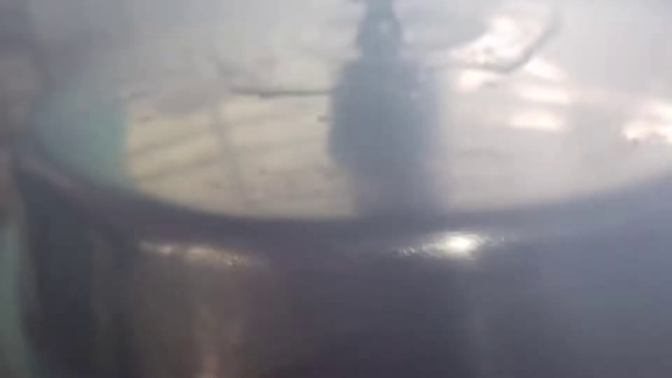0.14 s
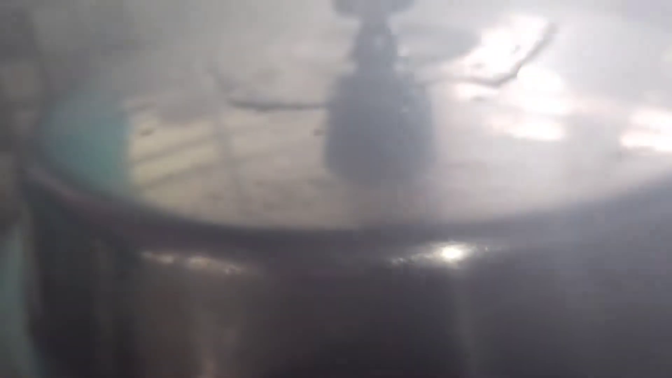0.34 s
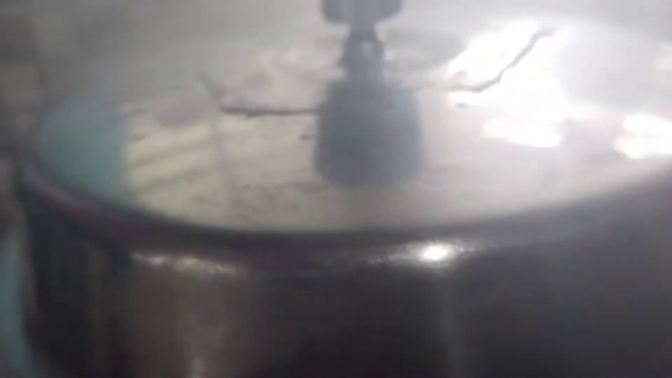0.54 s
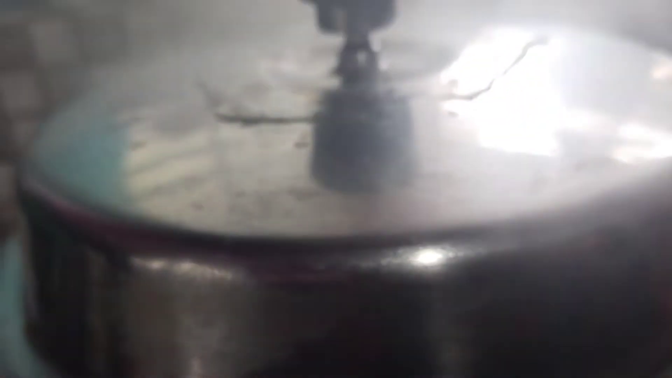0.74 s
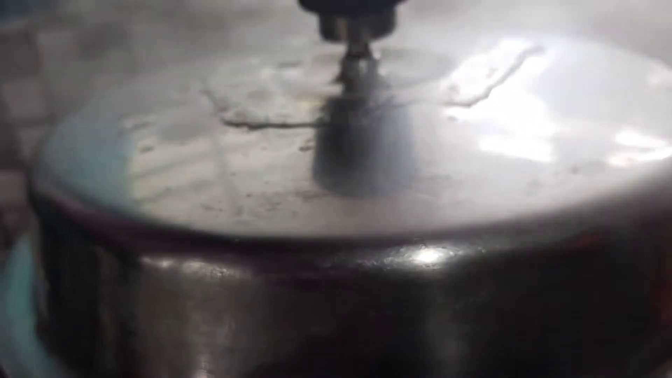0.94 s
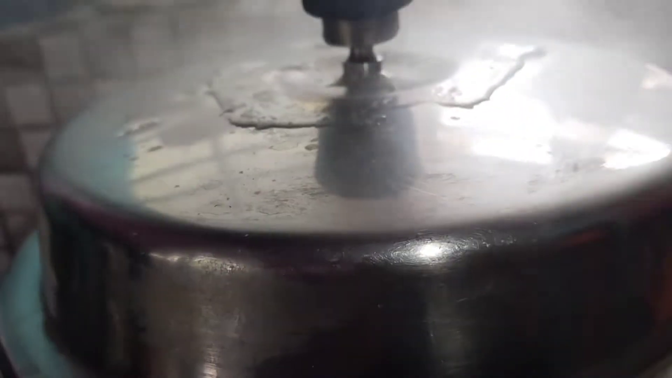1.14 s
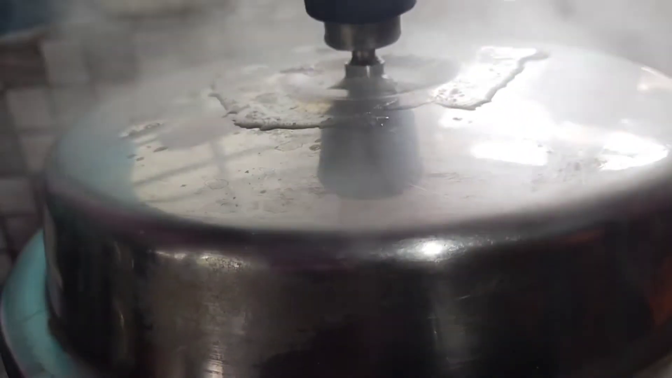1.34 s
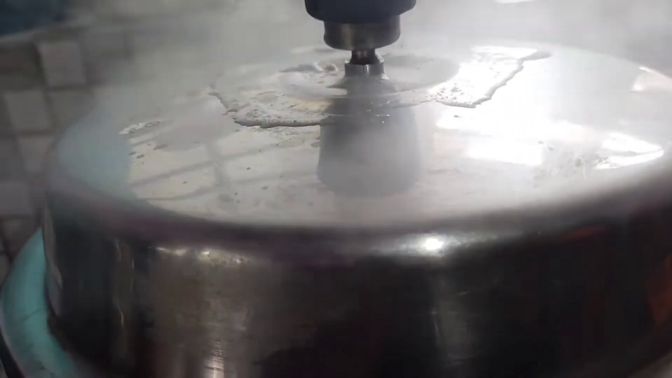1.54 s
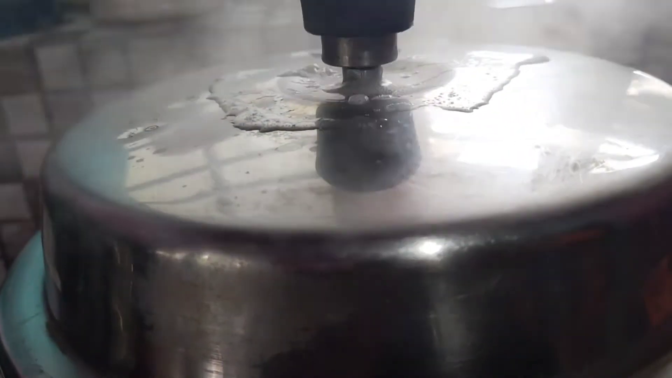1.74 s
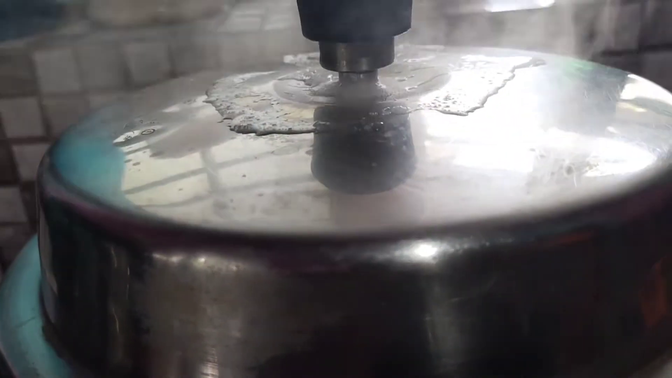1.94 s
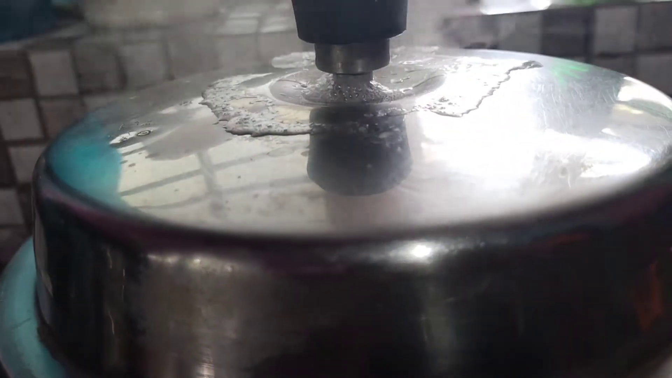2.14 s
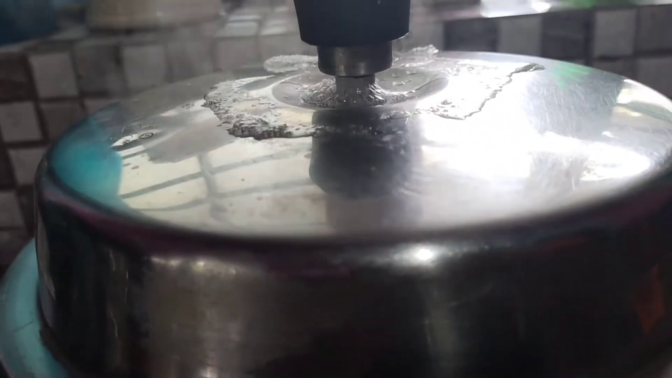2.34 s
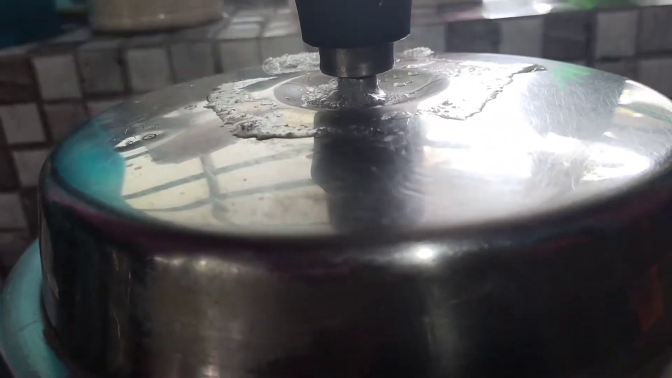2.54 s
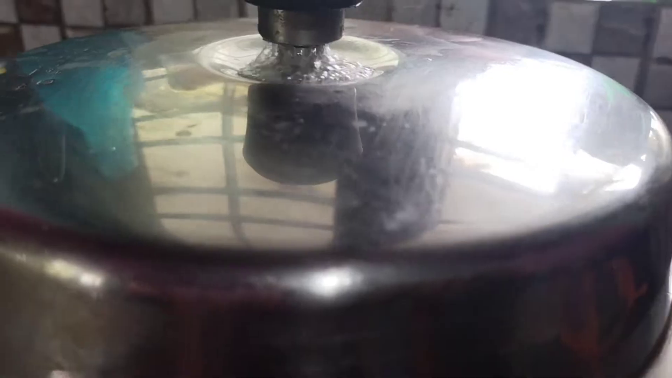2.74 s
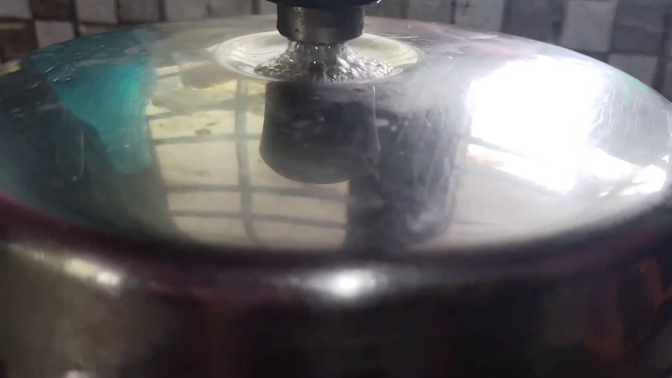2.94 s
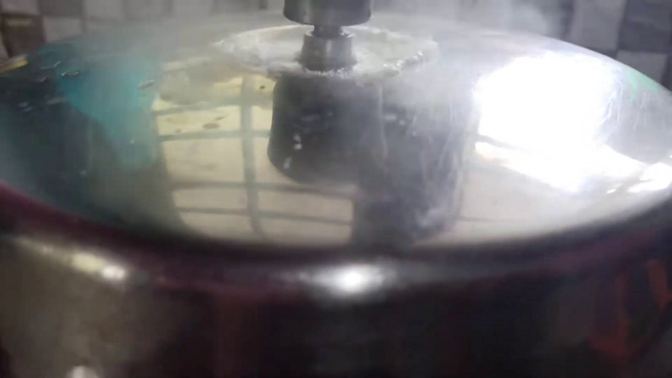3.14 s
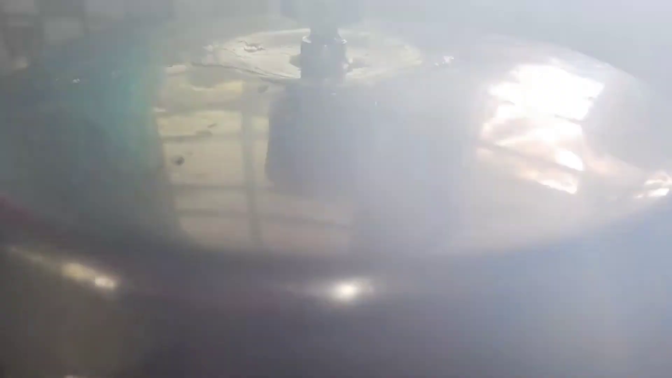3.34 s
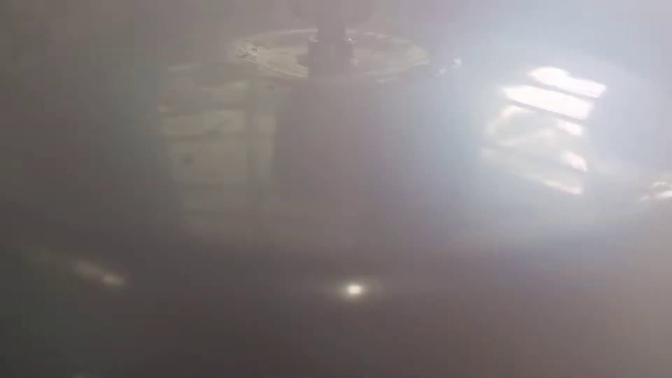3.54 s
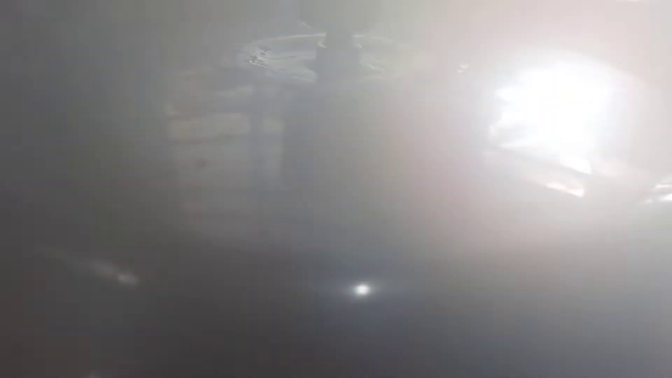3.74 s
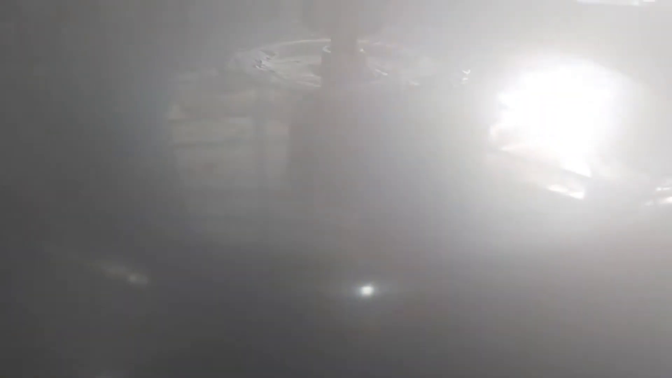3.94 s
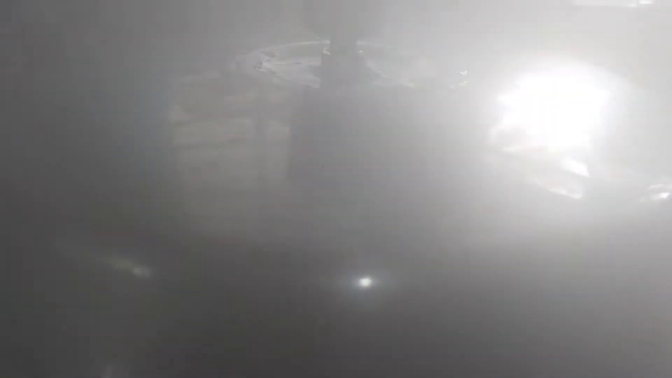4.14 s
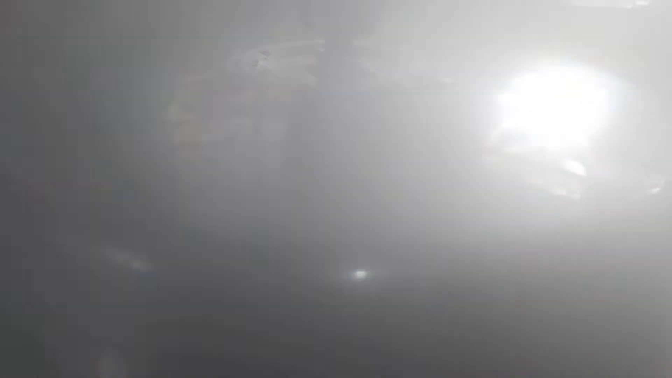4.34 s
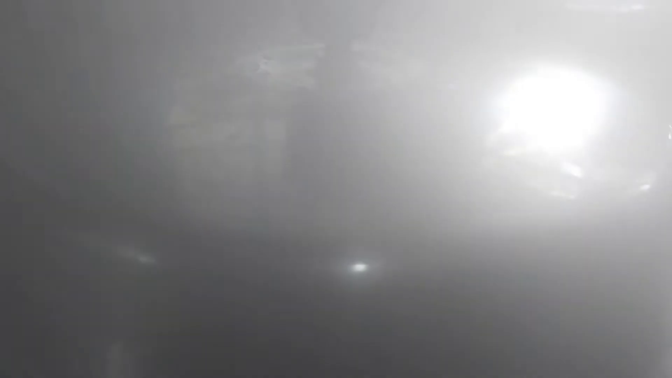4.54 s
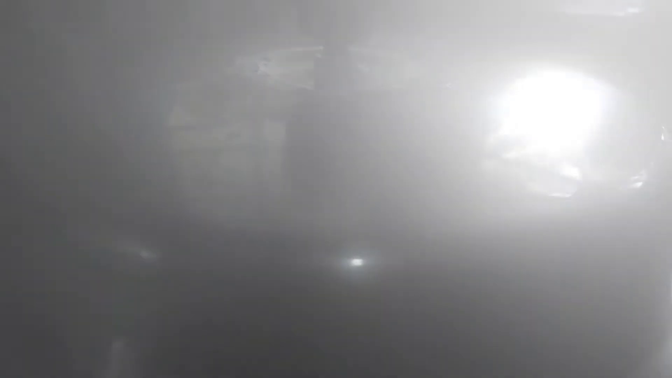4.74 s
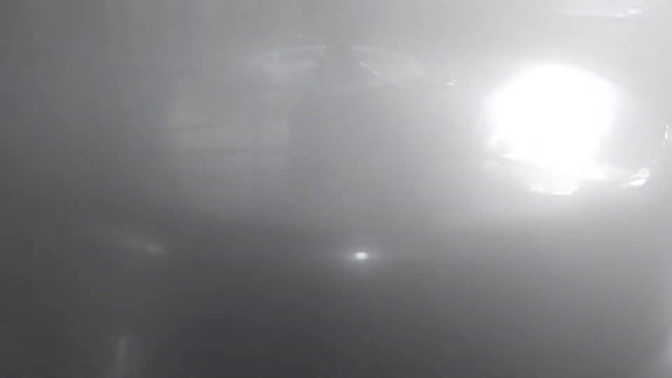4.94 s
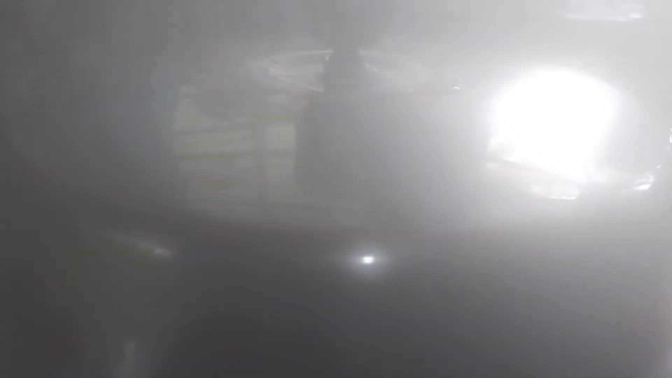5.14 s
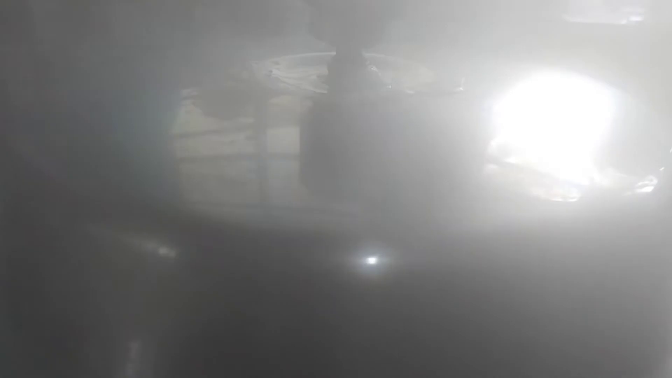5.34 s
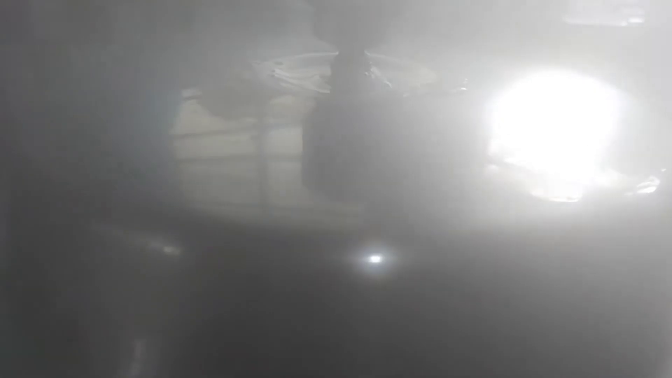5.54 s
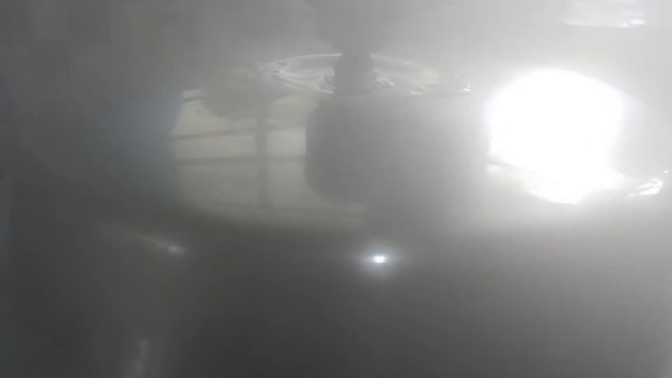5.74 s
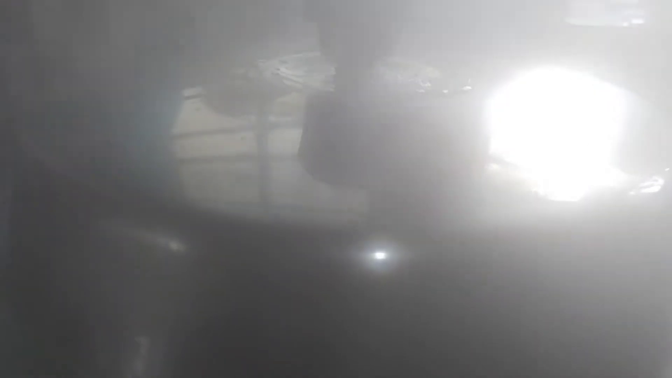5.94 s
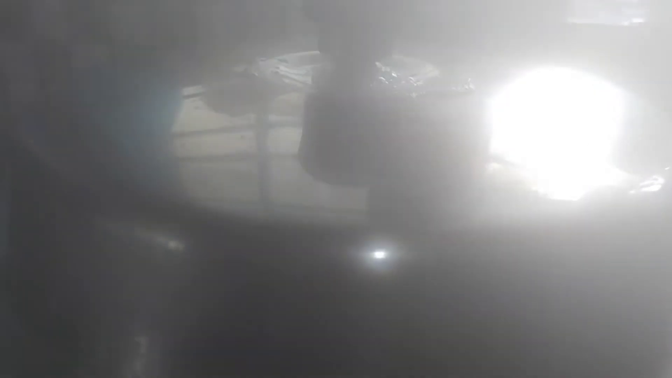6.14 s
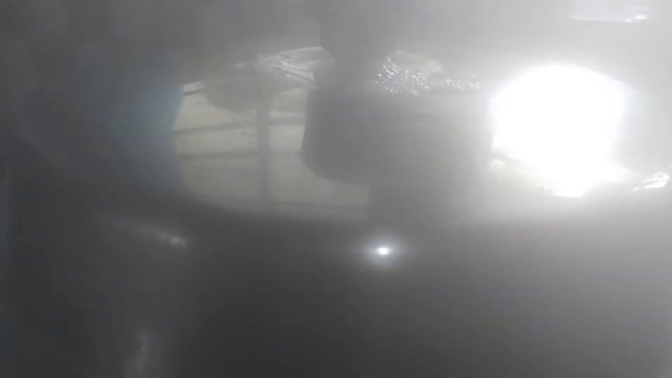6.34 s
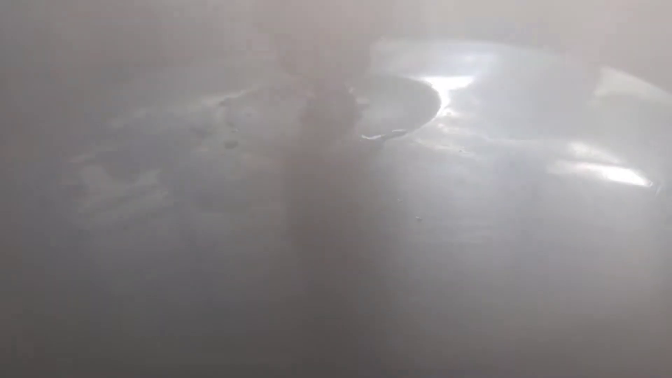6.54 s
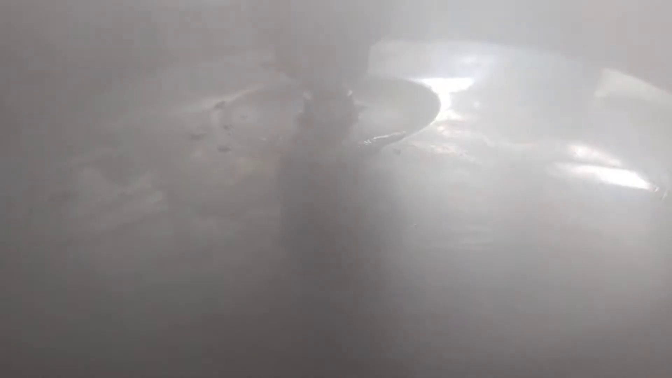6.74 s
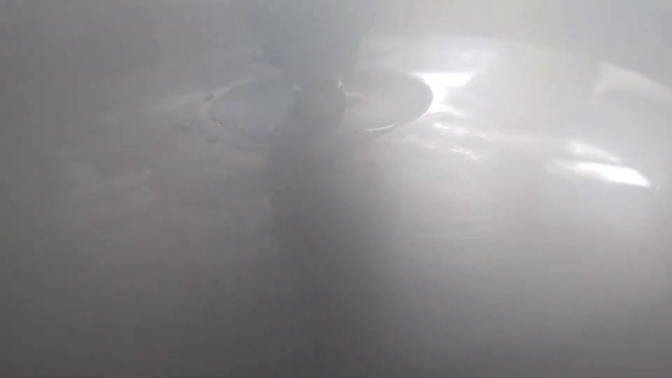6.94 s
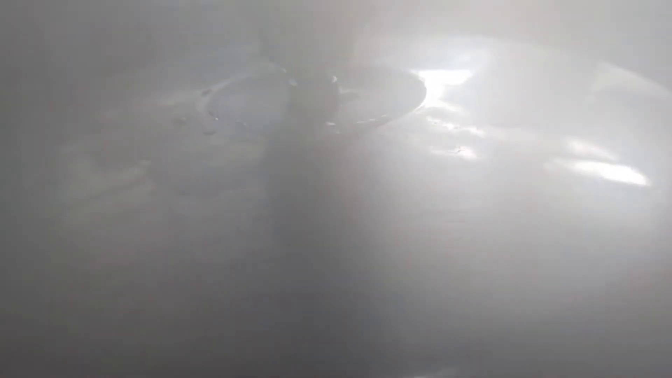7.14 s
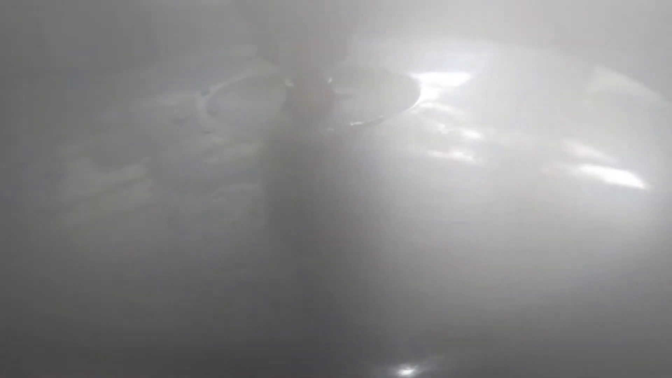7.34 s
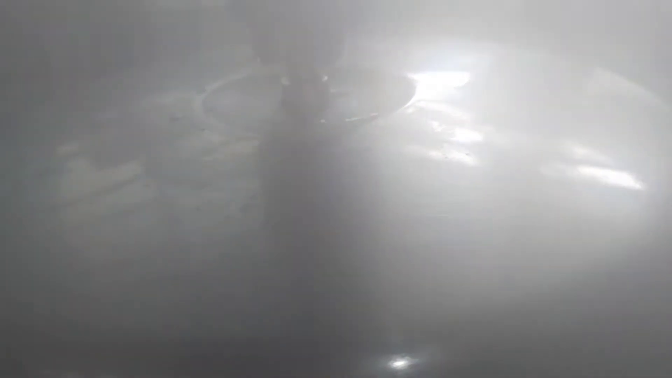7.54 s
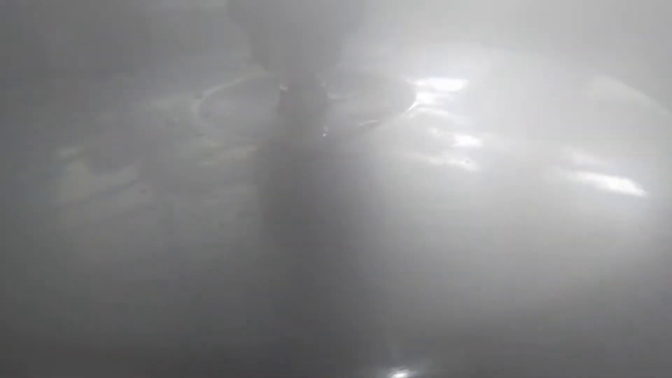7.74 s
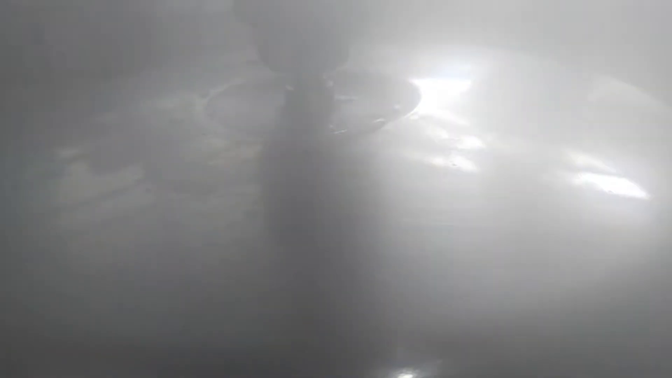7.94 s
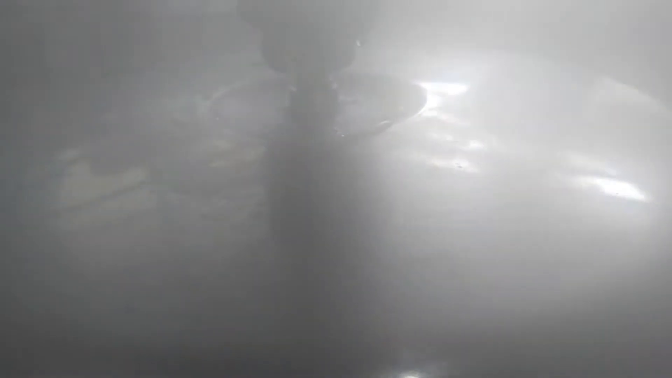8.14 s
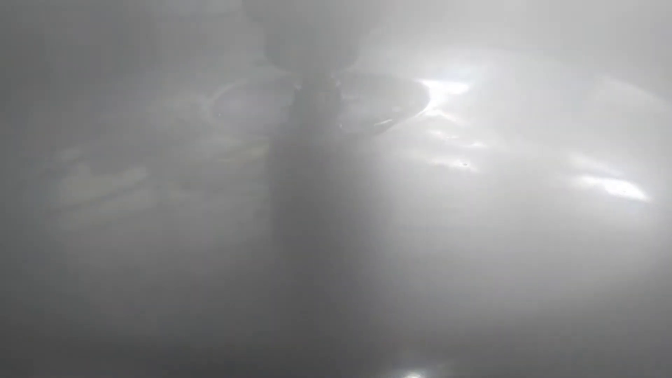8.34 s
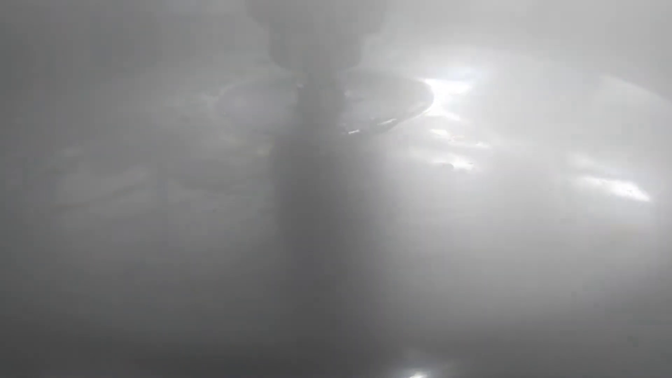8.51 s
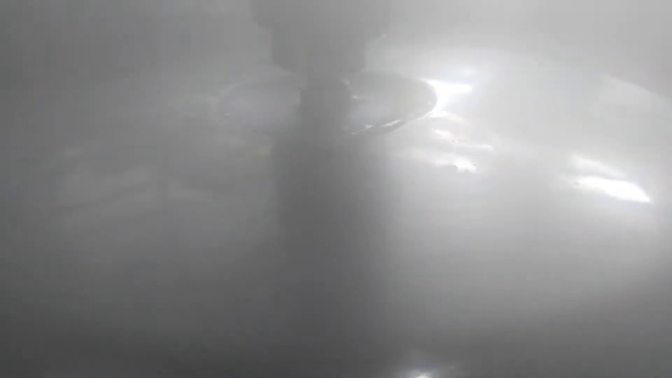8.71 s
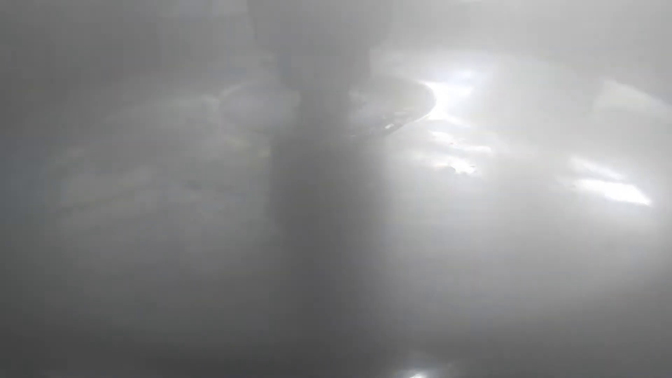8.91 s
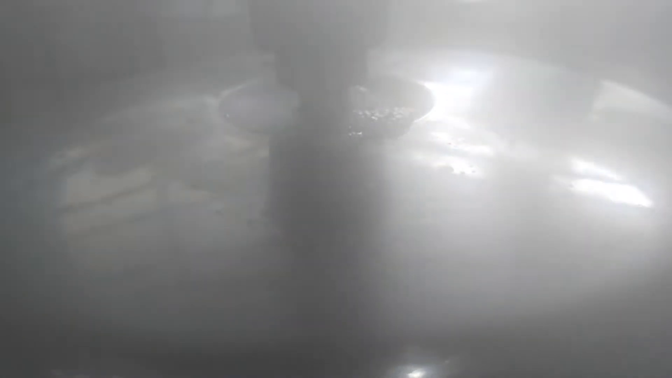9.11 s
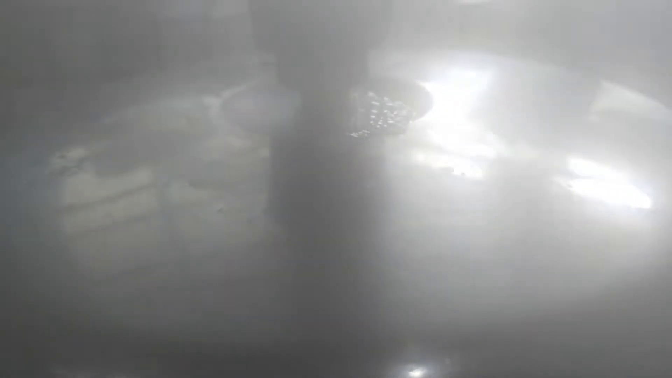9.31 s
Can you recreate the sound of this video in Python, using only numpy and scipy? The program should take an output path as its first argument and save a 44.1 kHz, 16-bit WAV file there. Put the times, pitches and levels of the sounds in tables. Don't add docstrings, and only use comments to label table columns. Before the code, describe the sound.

A stovetop cooker releases three long steam jets, each a dense bright hiss with a steady high whistle and low turbulent gusting. The weight knocks and scrapes on the ringing metal lid after each. Between jets, thin leaks, soft puffs, simmer and low flame rumble emerge. Abrupt scene changes and a tiny silence separate the sections. The stereo microphone is very close, with the whistle stronger on the left.

```python
import sys
import numpy as np
from scipy import signal
from scipy.fft import rfft, irfft, next_fast_len
from scipy.io import wavfile
from scipy.ndimage import uniform_filter1d

SR = 44100
rng = np.random.default_rng(int(sys.argv[2]) if len(sys.argv) > 2 else 0)


def gain_from_db(level_db):
    decades = np.asarray(level_db, float) / 20
    return 10 ** decades


def transcribe(signal):
    frames = np.atleast_2d(signal).T
    limited = np.clip(frames, -1, 1)
    pcm = np.round(limited * 32767).astype(np.int16)
    wavfile.write(sys.argv[1], SR, pcm)


N = 417627

# start [s], end [s], lag of the
STAGES = [(0, 2.602, 9), (2.602, 4.45, 9), (4.45, 6.4, 9), (6.4, 9.47, 12)]
# blast sets in [s], weight drops [s], level [dB], sag [dB/s], fall after the drop
# [dB/s].
BLASTS = [
    (0, 1.751, -20, -1.45, -140),
    (3.042, 5.885, -23, 0.41, -140),
    (6.467, 8.88, -21, -.5, -200),
]
# start [s], end [s], level [dB], slope [dB/s], share of treble kept [0-1].
LEAKS = [(2.0, 2.608, -67.5, 11.5, 0.94), (6.03, 6.333, -55.5, -1, 0), (6.434, 6.463, -53, 149.5, 0.1),
         (8.973, 9.194, -37, -94, 0), (9.1, 9.468, -60.5, 1, 0)]

SHARED_HISS, SHARED_WHISTLE = 0.36, 0.85
RING_DELAY = 13
SILENT_DB = -140


def unit(x):
    return x / np.sqrt(np.mean(x ** 2, axis=-1, keepdims=True) + 1e-20)


def coloured(x, points):
    hz, db = np.transpose(points)
    size = next_fast_len(N)
    bins_hz = np.arange(size // 2 + 1) * SR / size
    gain = gain_from_db(np.interp(np.log(bins_hz + 1), np.log(hz), db))
    return unit(irfft(rfft(x, size) * gain, size)[..., :N])


def resonate(x, hz, width_hz):
    r = np.exp(-np.pi * width_hz / SR)
    poles = [1, -2 * r * np.cos(2 * np.pi * hz / SR), r * r]
    return signal.lfilter([(1 - r * r) / 2, 0, (r * r - 1) / 2], poles, x)


def flutter(rate_hz, db):
    r = np.exp(-80 * np.pi * rate_hz / SR)
    slow = signal.lfilter([1], [1, -2 * r, r * r], rng.standard_normal(N // 40 + 2002))
    slow = unit(slow[2000:])
    return gain_from_db(db * np.interp(np.arange(N) / 40, np.arange(len(slow)), slow))


def ramps(rows):
    t = np.arange(N) / SR
    slopes = [np.where((t >= s) & (t <= end), db + slope * (t - s), SILENT_DB) for s, end, db, slope in rows]
    return np.max(slopes, axis=0)


def steps(starts, values, glide_s):
    row = np.searchsorted(starts, np.arange(N) / SR, "right") - 1
    held = np.array(values, float)[row]
    return uniform_filter1d(held, round(glide_s * SR) + 1, axis=0)


def span(start_s, end_s):
    return slice(round(start_s * SR), round(end_s * SR))


def flow():
    t = np.arange(N) / SR
    hold = [(onset, drop, db, sag) for onset, drop, db, sag, fall in BLASTS]
    dying = [(drop, drop + 0.5, db + sag * (drop - onset), fall) for onset, drop, db, sag, fall in BLASTS]
    steady = ramps(hold + dying + [row[:4] for row in LEAKS])
    peak_s, period_s = 2.64, 0.198
    throb = -32 + 2.5 * np.cos(2 * np.pi * (t - peak_s) / period_s)
    puffs = np.where((t >= 2.604) & (t < 3.04), throb, SILENT_DB)
    falter = -3 * np.exp(-((t - 3.76) / 0.13) ** 2)
    return np.maximum(steady, puffs) + falter


def whistle_band(x):
    return signal.sosfilt(signal.butter(2, [1800, 4800], "band", fs=SR, output="sos"), x)


def left_port(common, own, spare, ring5_db, ring7_db, top_db):
    # centre [Hz], width [Hz], level [dB].
    whistle_modes = [
        [(2890, 3800, -6), (2560, 130, 6), (2880, 155, 10), (3043, 29, 12), (3520, 280, -12.5)],
        [(2770, 340, -7.5), (2505, 80, -13), (2895, 120, -4), (3073, 34, 1), (3340, 77, -6)],
        [(2960, 230, -3), (2510, 420, -6), (2820, 110, -1.5), (2984, 28, 3.5), (3490, 82, -1)],
        [(2850, 3300, -4.5), (2480, 75, -0.5), (2682, 65, 10), (2785, 44, 7), (2950, 60, 10)],
    ]
    # centre [Hz], width [Hz].
    modes_5k = [(6050, 1900), (5400, 2800), (5295, 610), (6150, 2600)]
    modes_7k = [(7260, 1530), (7250, 790), (7120, 1540), (7210, 1600)]
    # frequency [Hz], level [dB per Hz].
    top_colour = [(3000, -44), (4500, -11.5), (8000, 0.5), (10000, 2.5), (11200, 6), (12700, 9),
                  (15000, -5), (15600, 1.5)]
    whistle, ring5, ring7, hiss = np.zeros((4, N))
    for (start, end, lag), modes, mode5, mode7 in zip(STAGES, whistle_modes, modes_5k, modes_7k):
        part = span(start, end)
        alike = np.sqrt(SHARED_HISS) * np.roll(common, lag + RING_DELAY)
        hiss[part] = (alike + np.sqrt(1 - SHARED_HISS) * own)[part]
        heard = whistle_band(np.roll(common, lag)[part])
        whistle[part] = unit(sum(gain_from_db(db) * resonate(heard, hz, width) for hz, width, db in modes))
        ring5[part] = unit(resonate(resonate(spare[part], *mode5), *mode5))
        ring7[part] = unit(resonate(resonate(hiss[part], *mode7), *mode7))
    left = gain_from_db(7.5) * whistle * flutter(21, 0.16)
    left += gain_from_db(ring5_db + 7.0) * ring5 * flutter(21, 0.68)
    left += gain_from_db(ring7_db + 2.0) * ring7 * flutter(21, 0.98)
    return left + gain_from_db(top_db + 2.5) * coloured(hiss, top_colour)


def right_port(common, own, spare, top_db):
    # frequency [Hz], level [dB per Hz].
    jet_colour = [(900, -30.5), (1900, -3.5), (3000, 3), (4500, 0), (7500, -2), (9000, 2.5), (10000, -3),
                  (15500, -5)]
    hiss = np.sqrt(SHARED_HISS) * np.roll(common, RING_DELAY) + np.sqrt(1 - SHARED_HISS) * own
    tone = np.sqrt(SHARED_WHISTLE) * common + np.sqrt(1 - SHARED_WHISTLE) * spare[::-1]
    tone = whistle_band(tone)
    tone = resonate(tone, 3000, 2200) + 0.5 * resonate(tone, 2680, 120)
    return gain_from_db(top_db + 10.5) * coloured(hiss, jet_colour) + gain_from_db(-24) * unit(tone)


def swaying_dips(hiss):
    # dip centre [Hz], width [Hz], depth [0-1].
    dips = [(5100, 500, .25), (11300, 1200, .45), (12200, 1200, .4), (5200, 400, .55)]
    for (start, end, lag), (hz, width_hz, depth) in zip(STAGES, dips):
        part = span(start, end)
        for shift in (-0.035, 0.035):
            sway = np.clip(depth * flutter(6, 5.5)[part], 0, 1)
            hiss[:, part] -= sway * resonate(hiss[:, part], hz * (1 + shift), width_hz)
    return hiss


def dull_leaks(hiss):
    dull = signal.sosfilt(signal.butter(6, 10400, fs=SR, output="sos"), hiss)
    dull += gain_from_db(-10) * signal.sosfilt(signal.butter(6, 13000, "high", fs=SR, output="sos"), hiss)
    kept = np.ones(N)
    for start, end, db, slope, share in LEAKS:
        kept[span(start, end)] = share
    kept = signal.lfilter([0.0006], [1, -0.9994], kept, zi=[1.0])[0] ** 2
    kept[span(*BLASTS[2][:2])] = 1
    return dull + kept * (hiss - dull)


def jet():
    # start [s], 5 kHz ring [dB], 7 kHz ring [dB],
    # top hiss [dB], left over right in the top hiss [dB].
    aim = [(0, -11.5, -9, -8.5, -2), (1.0, -11.5, -7, -9.5, -6.5), (1.8, 0, -9, -10.5, -4),
           (2.05, 0.5, -3, -1, -2), (2.604, -4, 3, -7, 7), (3.04, -9, 0, -6.5, 3), (3.09, -2, 0, -3, -1),
           (3.14, -2.5, 0, -1, 2), (3.45, -3, 0.5, -3, 4), (4.0, -3, 0, -2.5, 5.5),
           (4.22, -4.5, 0.5, -5, 2), (4.45, -7, 0, -4.5, 5.5), (4.75, -7.5, -3.5, -5, 7),
           (5.95, -5, -3, -6, 6), (6.15, -3.5, -1, -7, 0), (6.467, -8, -4, -6.5, -0.5),
           (7.5, -9, -2, -7.5, -3), (8.4, -7, -3, -8.5, -7.5), (8.93, -1.5, 2.5, -6.5, 1),
           (9.151, 0, 5, -9, -17)]
    starts, *values = np.transpose(aim)
    ring5_db, ring7_db, top_db, pan_db = steps(starts, np.transpose(values), 0.032).T
    common, own_left, own_right, spare = rng.standard_normal((4, N))
    left = left_port(common, own_left, spare, ring5_db, ring7_db, top_db + pan_db / 2)
    right = right_port(common, own_right, spare, top_db - pan_db / 2)
    hiss = dull_leaks(swaying_dips(np.array([left, right])))
    return gain_from_db(flow()) * flutter(23, 0.34) * flutter(5.2, 0.25) * hiss


def buffet():
    # time [s], level [dB].
    gusts = [
        [(0.0, -38.5), (0.308, -52), (0.524, -44.5), (0.71, -52), (1.268, -39.5), (1.744, -48), (1.76, -46)],
        [(3.05, -46.5), (3.1, -38), (3.2, -30.5), (3.23, -34), (4.03, -33.5), (5.69, -47.5), (5.89, -40.5)],
        [(6.48, -41.5), (6.52, -42), (6.71, -40.5), (7.92, -47), (7.96, -40), (8.19, -46), (8.88, -46.5)],
    ]
    # left over right [dB], more of it per dB of gust [dB].
    gust_sides = [
        (-10, 0.36),
        (1.5, 0.76),
        (0.5, 1.08),
    ]
    lifts, drops = np.transpose(BLASTS)[:2]
    gust_db = 7 + np.interp(np.arange(N) / SR, *np.vstack(gusts).T)
    blowing = [(onset, drop, 0, 0) for onset, drop in zip(lifts, drops)]
    falling = [(drop, drop + 0.5, 0, -260) for drop in drops]
    level_db = gust_db + ramps(blowing + falling)
    excess_db = gust_db + 34.5
    side_db, side_per_db = steps(lifts, gust_sides, 0).T
    pan_db = side_db + side_per_db * excess_db
    tilt_db = 2.5 - 0.24 * excess_db
    white = rng.standard_normal((2, 2, N))
    deep = coloured(white[0], [(25, -44), (60, -9), (110, -0.5), (300, 1.5), (600, -2), (1200, -18)])
    high = coloured(white[1], [(250, -17.5), (600, -6.5), (1200, -5.5), (1900, -4.5), (2600, -3), (4000, -46)])
    lumps = np.array([flutter(45, 0.8), flutter(45, 2.1)])
    mix = lumps * (gain_from_db(-2.5 - tilt_db) * deep + gain_from_db(1.5 + tilt_db) * high)
    return gain_from_db(level_db + pan_db / 2 * [[1], [-1]]) * mix


def rub():
    # start [s], end [s], level [dB], slope [dB/s], first bite [dB].
    rubs = [(1.797, 1.996, -45.5, -110, -34), (2.396, 2.56, -57, -5, -60), (2.604, 3.04, -59, -14, -50),
            (5.925, 6.129, -42.5, -50, -21), (6.13, 6.333, -39.5, -99, -35.5),
            (8.922, 9.24, -47.5, -1, -40), (9.24, 9.407, -50, -5, -44), (9.408, 9.474, -47, -60, -41)]
    # frequency [Hz], width [Hz], level [dB].
    rub_modes = [
        [(400, 65, 8.5), (938, 53, 7), (1500, 84, 0)],
        [(3300, 40, -6), (1690, 270, -8)],
        [(400, 59, -4), (940, 81, 10.5), (1450, 150, -6)],
        [(470, 76, 1.5), (920, 74, 2.5), (1510, 60, -1.5), (2670, 83, 2)],
        [(470, 270, 4), (980, 74, 1.5), (1474, 40, 1), (1950, 35, -4), (2430, 88, 0), (2750, 81, 1.5),
         (3500, 80, -9)],
        [(1030, 100, -4), (1480, 96, -2.5), (2160, 140, 1.5), (2440, 150, 6), (2730, 110, -14)],
        [(600, 170, -4), (990, 65, 1), (1444, 59, 3), (2050, 97, 3), (2360, 110, 6), (2635, 17, 0)],
        [(600, 110, -12), (994, 30, 6), (2500, 150, -3)],
    ]
    bites = [(start, end, bite, -550) for start, end, db, slope, bite in rubs]
    level_db = ramps([row[:4] for row in rubs] + bites)
    contacts = rng.standard_normal(N) * flutter(40, 2.0) * flutter(5.0, 1.8)
    out = np.zeros((2, N))
    for (start, end, *_), modes in zip(rubs, rub_modes):
        part = span(start, end)
        for hz, width_hz, db in modes:
            ring = unit(resonate(resonate(contacts[part], hz, width_hz), hz, width_hz * 2))
            lean_db = 8.7 * np.log2(hz / 500)
            out[:, part] += gain_from_db(db - 7.0 + np.array([[lean_db / 2], [-lean_db / 2]])) * ring
    return gain_from_db(level_db) * out


def knocks():
    # time [s], peak level [dB], brightness [dB per octave], ring length [factor].
    weight_drops = [(1.802, -22, -1, 0.93), (3.042, -10, 2.5, 0.88), (3.182, -10.5, 8.5, 0.52),
                    (5.925, -15, -5, 0.91), (6.131, -35, 0, 1.4), (8.92, -17.5, -1.5, 0.9),
                    (9.239, -37, 6, 0.74), (9.413, -33, -6, 0.98)]
    # frequency [Hz], level [dB], time to fall 60 dB [s].
    lid_modes = [(429, -8, 0.34), (586, -3.5, 0.15), (922, 4, 0.17), (1040, -6, 0.072), (1564, 7, 0.086),
                 (2140, 7.5, 0.088), (2460, -12, .06), (2710, -4, 0.041), (3500, -28, 0.055)]
    out, t = np.zeros((2, N)), np.arange(SR // 2) / SR
    click_band = signal.butter(2, [350, 4000], "band", fs=SR, output="sos")
    for start, db, bright_db, longer in weight_drops:
        contacts = rng.standard_normal(len(t)) * np.exp(-t / 0.0014)
        ring = np.zeros(len(t))
        for hz, mode_db, t60 in lid_modes:
            level_luck, pitch_luck = rng.standard_normal(2)
            level_db = mode_db + bright_db * np.log2(hz / 1000) + 2.0 * level_luck
            tone = np.sin(2 * np.pi * hz * (1 + 0.0047 * pitch_luck) * t)
            ring += gain_from_db(level_db - 60 * t / (t60 * longer)) * tone
        rough = signal.fftconvolve(ring, contacts)[:len(t)] / np.sqrt(np.sum(contacts ** 2))
        click = signal.sosfilt(click_band, contacts)
        sound = gain_from_db(db - 15.5) * (0.35 * ring + 0.72 * rough + 1.23 * click)
        at = round(start * SR)
        out[:, at:at + len(t)] += (sound * gain_from_db([[2.5], [-2.5]]))[:, :N - at]
    return out


def flame():
    # start [s], end [s], ducked level [dB], full level [dB].
    burner = [(1.86, 2.609, -66.5, -45.5), (2.604, 3.04, -72, -60), (5.955, 6.324, -67, -53.5),
              (6.435, 6.463, -49, -50), (8.94, 9.475, -70.5, -51)]
    # frequency [Hz], level [dB per Hz].
    rumble_colour = [(24, -57), (64, -40), (86, 1.5), (145, -2), (258, -13), (360, -5.5), (514, -17.5),
                     (1170, -65)]
    # start [s], end [s], level [dB], slope [dB/s].
    simmering = [(1.85, 2.05, -45, -120), (2.0, 2.604, -56.5, 25), (2.604, 3.04, -42.5, -2),
                 (5.95, 6.333, -34, -34), (6.433, 6.468, -49, 5), (8.95, 9.2, -37, -72),
                 (9.235, 9.47, -32.5, -60)]
    rising_db = ramps([(start, end, ducked, 62) for start, end, ducked, full in burner])
    full_db = ramps([(start, end, full, 0) for start, end, ducked, full in burner])
    rumble_db = np.minimum(rising_db, full_db)
    both, *own = rng.standard_normal((3, N))
    rumble = coloured(both + 0.27 * np.array(own), rumble_colour) * flutter(6.8, 0.64)
    simmer_colour = [(400, -15.5), (700, -6), (1000, -4), (1800, -4.5), (2500, -9), (4000, -31)]
    simmer = coloured(both + 3.5 * np.array(own), simmer_colour)
    return gain_from_db(rumble_db) * rumble + gain_from_db(ramps(simmering) - 9.5) * simmer * gain_from_db([[1.5], [-1.5]])


def scene():
    return jet() + buffet() + rub() + knocks() + flame()


def band_limit(x):
    return signal.sosfilt(signal.butter(12, 16460, fs=SR, output="sos"), x)


def record(dry):
    t = np.arange(N) / SR
    gap = np.interp(t, [6.329, 6.331, 6.432, 6.434], [1, 0, 0, 1])
    rounded = 1.084 * np.tanh(dry * gap / 1.087)
    treble_cut = signal.ellip(12, 0.3, 70, 15450, fs=SR, output="sos")
    bass_cut = signal.butter(2, 55, "high", fs=SR, output="sos")
    return band_limit(signal.sosfilt(np.vstack([treble_cut, bass_cut]), rounded))


dry = scene()
out = record(dry)
transcribe(out)
```